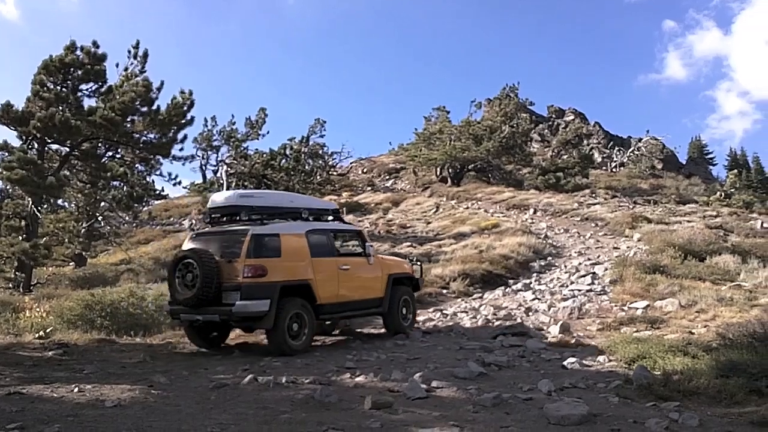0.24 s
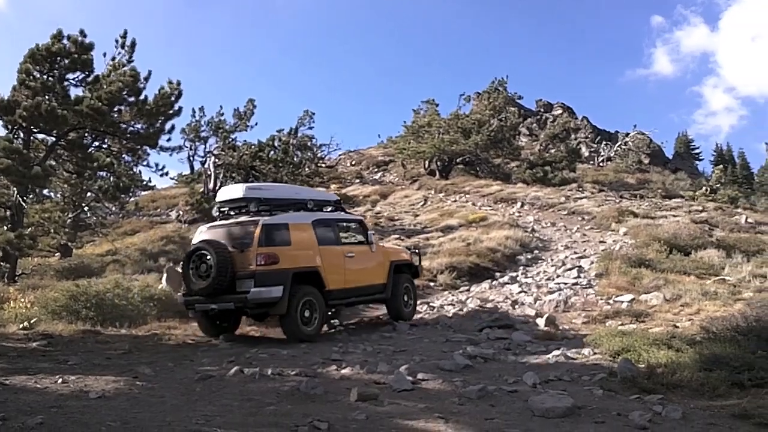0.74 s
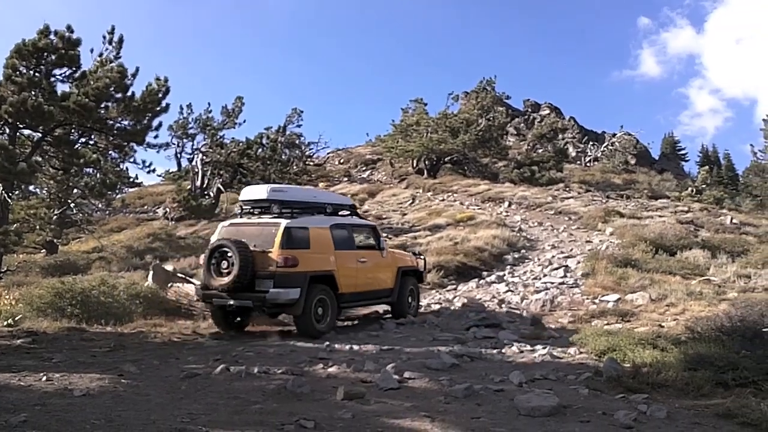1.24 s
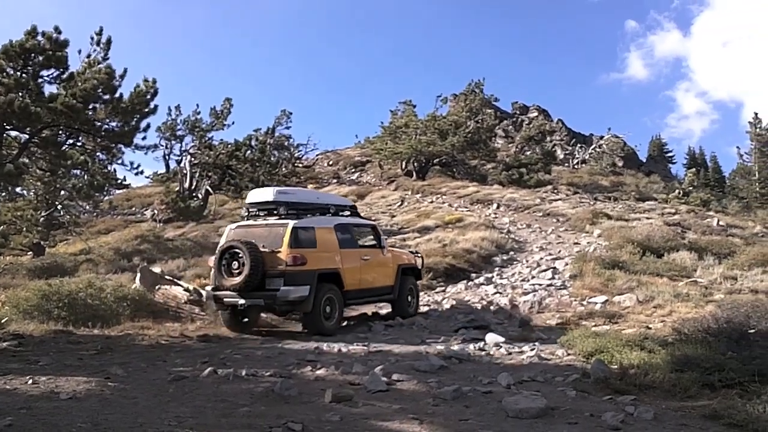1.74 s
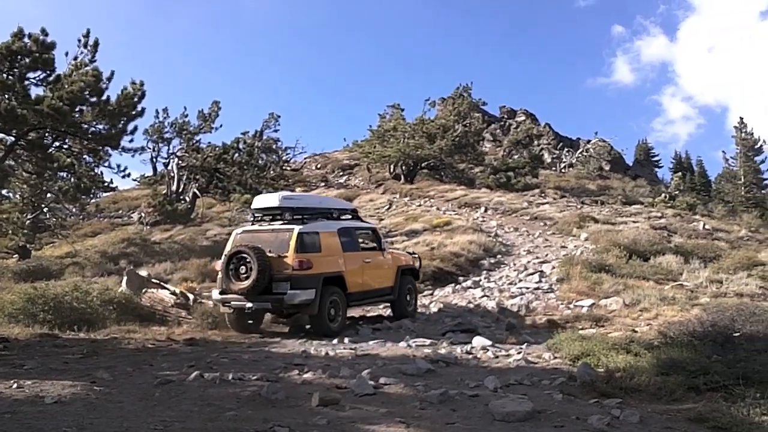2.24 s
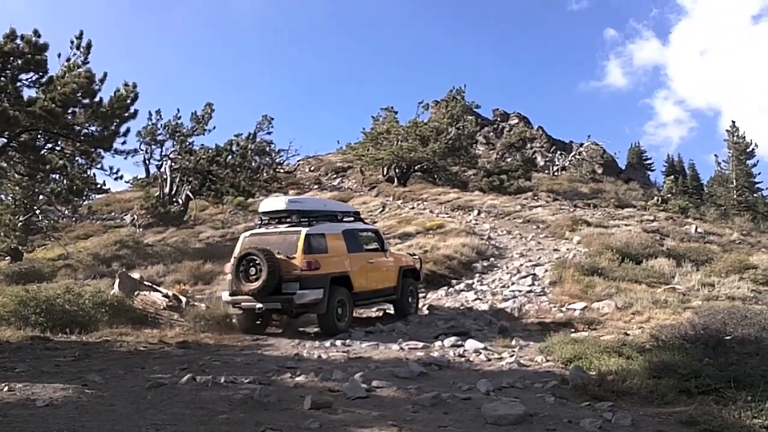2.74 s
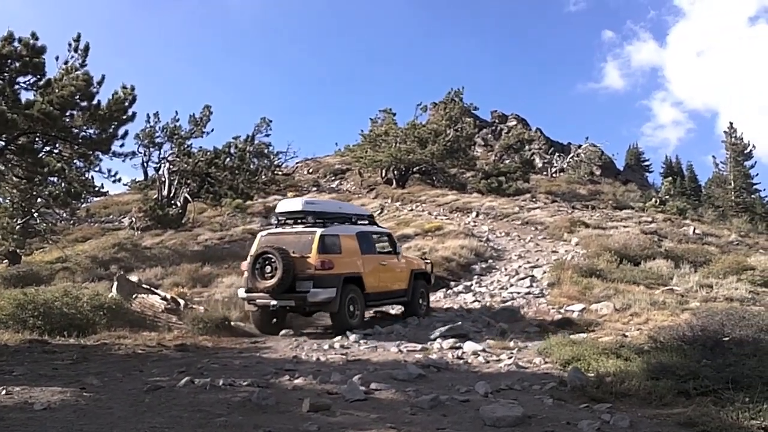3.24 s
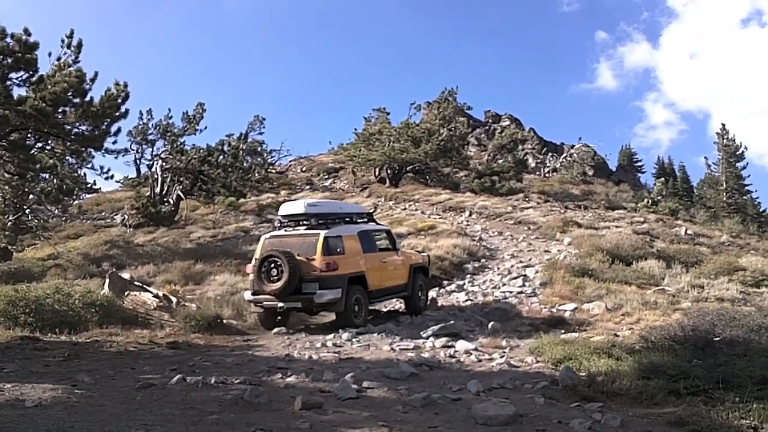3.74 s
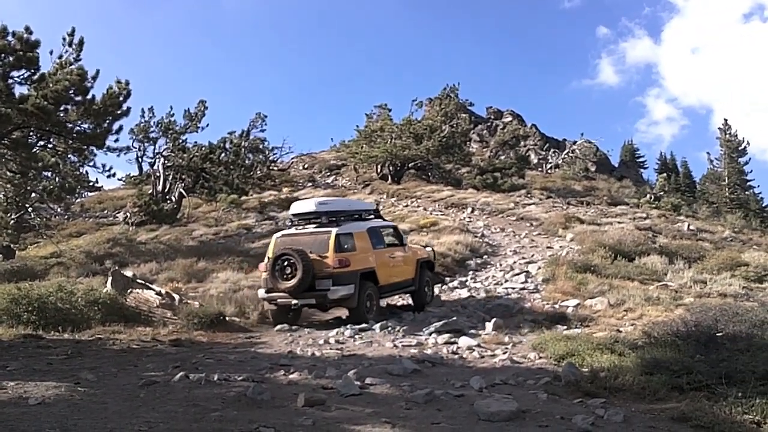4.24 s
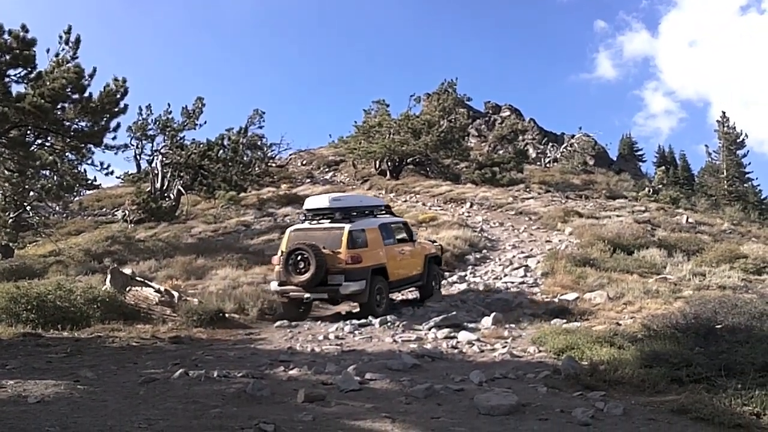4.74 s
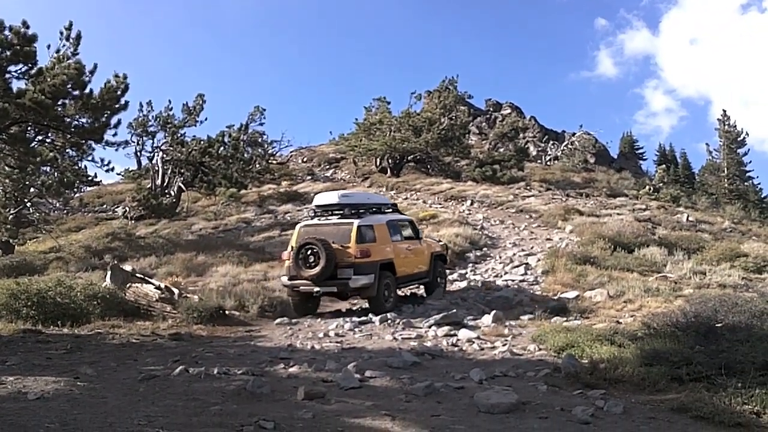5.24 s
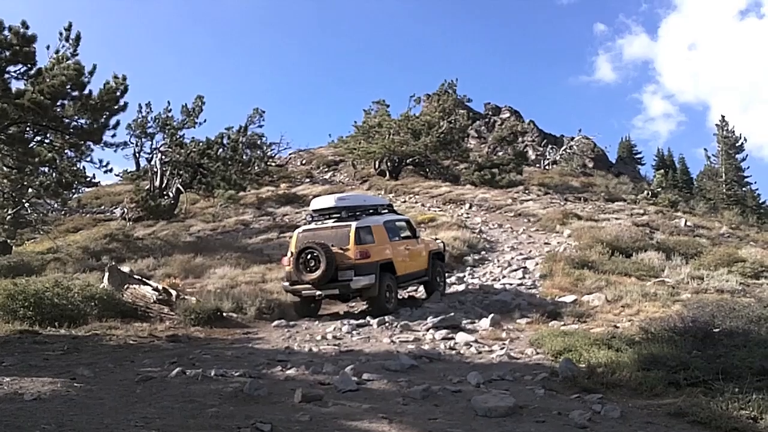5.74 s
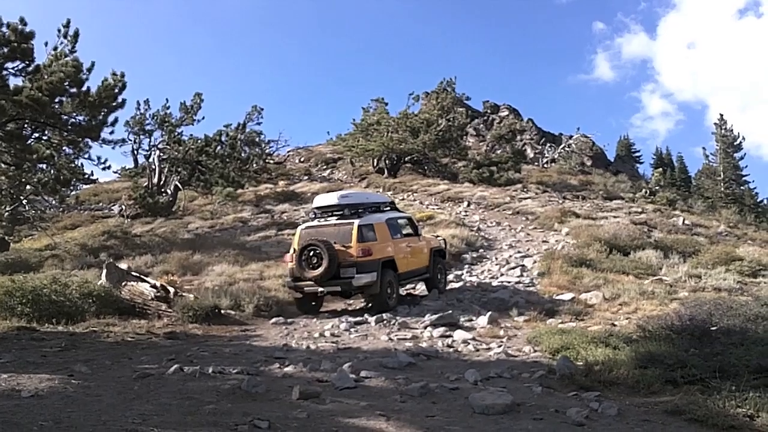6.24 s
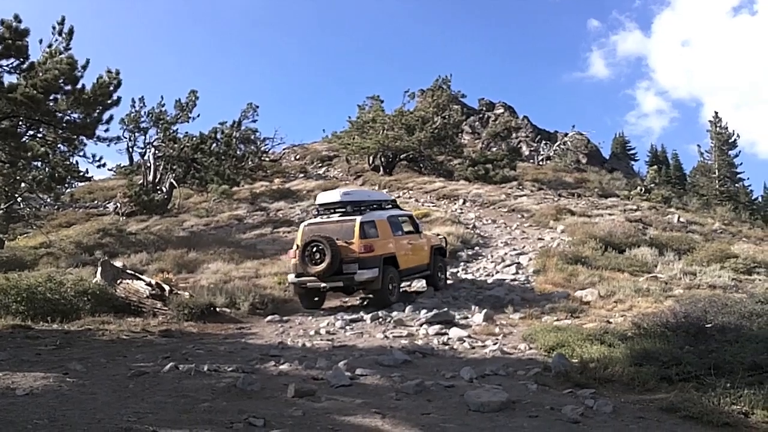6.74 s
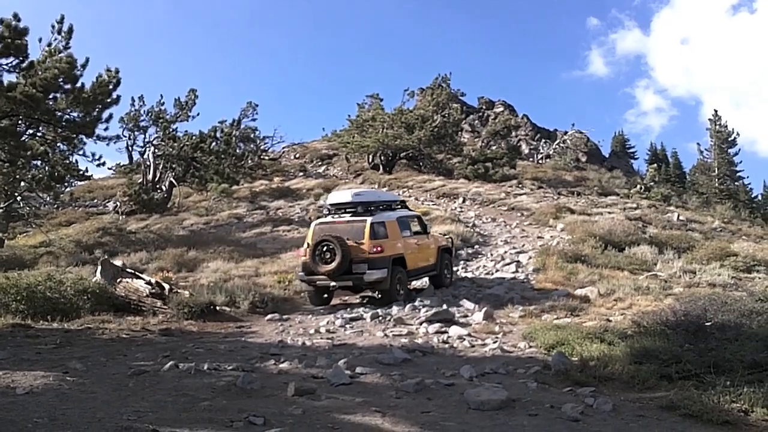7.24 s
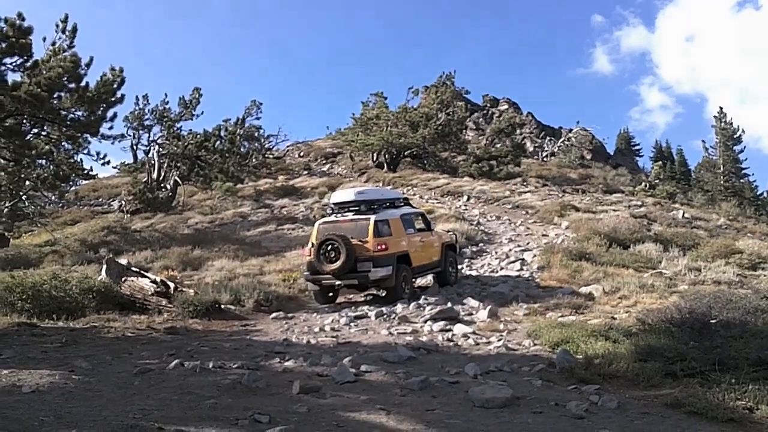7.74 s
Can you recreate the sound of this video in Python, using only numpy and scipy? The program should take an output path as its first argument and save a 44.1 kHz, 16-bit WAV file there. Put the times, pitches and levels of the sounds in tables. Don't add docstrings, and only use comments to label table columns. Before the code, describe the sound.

Outdoors on a rocky slope, an off-road car climbs away from a fixed microphone behind it. Its low exhaust drone booms and thins as the revs shift, with rough gas roar and gravelly hiss. Stones clack and crunch in scattered bursts, a small bird chips faintly, and wind bumps the microphone. The engine sags, revs again, then drops towards idle at the end.

```python
import sys
import numpy as np
from scipy import signal
from scipy.fft import rfft, irfft, next_fast_len
from scipy.io import wavfile
from scipy.ndimage import uniform_filter1d

SR = 44100
rng = np.random.default_rng(int(sys.argv[2]) if len(sys.argv) > 2 else 0)


def ratio_of_db(decibels):
    return 10 ** (np.asarray(decibels, float) / 20)


def unload_audio(sound):
    columns = np.transpose(np.atleast_2d(sound))
    steps = np.round(np.clip(columns, -1, 1) * 32767)
    wavfile.write(sys.argv[1], SR, steps.astype(np.int16))


N = 352359
T = np.arange(N) / SR


def level(x, db):
    return x * ratio_of_db(db) / np.sqrt(np.mean(x ** 2))


def colour_db(points, hz):
    f, db = np.transpose(points)
    return np.interp(np.log(np.maximum(hz, 1)), np.log(f), db, left=-60, right=-80)


def noise(points):
    size = next_fast_len(N)
    hz = np.arange(size // 2 + 1) * SR / size
    spectrum = rfft(rng.standard_normal(size)) * ratio_of_db(colour_db(points, hz))
    return level(irfft(spectrum, size)[:N], 0)


def smooth(x, k):
    return uniform_filter1d(uniform_filter1d(x, k), k)


def walk(rate):
    k = int(SR / rate)
    held = np.repeat(rng.standard_normal(N // k + 1), k)
    return 1.55 * smooth(held, k)[:N]


def band(x, lo_hz, hi_hz):
    y = signal.sosfilt(signal.butter(4, [lo_hz, hi_hz], "band", fs=SR, output="sos"), x)
    return y / np.abs(y).max()


# (t/s, f/Hz)
CYCLE_RATE = [(0, 27.0), (.3, 29.45), (1.12, 29.45), (1.53, 25.55), (1.8, 25.55), (2.22, 27.8),
              (3.06, 27.25), (3.25, 26.4), (3.5, 27.0), (3.75, 25.8), (4.03, 25.9), (4.27, 27.0),
              (4.66, 23.85), (5.05, 23.4), (5.5, 20.9), (6.15, 27.1), (6.42, 26.8), (7.55, 14.25)]


def engine_speed():
    return uniform_filter1d(np.interp(T, *np.transpose(CYCLE_RATE)), int(0.1 * SR), mode="nearest")


# (t/s, level/dB)
PEDAL = [(0, -3.5), (.22, 0.5), (.45, 1.1), (1.22, -2), (1.4, -7.5), (1.75, -2.5), (2.15, 0.9), (2.65, -2),
         (3.15, -1.5), (3.6, -2.5), (4.3, -2.7), (4.45, -2), (5.65, -1), (6.0, -2), (6.8, -0.5), (7.15, 3),
         (7.46, -5), (7.62, -1.5)]


def throttle():
    return np.interp(T, *np.transpose(PEDAL))


# (multiple, level/dB)
BOOM_DRIVE = [(4, -17.5), (5, -31.5), (6, -34), (7, -46), (8, -34.5)]


def boom_level(hz):
    peak_hz, skirt_hz, floor_db = 115.31, 3.12, -48
    power = ratio_of_db(2 * floor_db)
    for multiple, db in BOOM_DRIVE:
        off_peak = (multiple * hz - peak_hz) / skirt_hz
        power = power + ratio_of_db(2 * (db - off_peak ** 2))
    return 10 * np.log10(power)


PULL_DB = [-16, -2.5, -14, -4, -4, 0.5, -20, -2.5, -15, -7, -8.5, -7.5, -17, -17.5, -16, -16, -23, -16,
           -18.5, -17, -17, -20]
IDLE_DB = [-34.5, -21, 3.5, -22, -24, -24, -7, 7, -19, 3, -3, 8.5, -12, 8, 5.5, -4, -17, -18.5, -17, -20,
           -16, -15]
# (f/Hz, level/dB)
PIPE = [(20, -9.5), (38, -3), (50, 0), (75, -9), (135, -4), (165, -1), (190, -3.5), (218, 1.5), (238, -0.5),
        (260, -23), (330, -13), (450, -14.5), (660, -13.5)]
# (f/Hz, width/Hz, level/dB)
TAILPIPE = [(327, 14, 7), (441, 12, 9), (529, 12, 10), (622, 14, 7)]


def exhaust(hz, cycle, pull_db, boom_db):
    idle_hz, lug_hz, lug_db_per_hz = 17.5, 26.47, 2
    mode_hz, mode_width_hz = 113.4, 14.3
    idle = 1 / (1 + np.exp((hz - idle_hz) / 0.16))
    lug_db = (1 - idle) * lug_db_per_hz * np.maximum(lug_hz - hz, 0)
    boom, boom_power, rest = 0, 1e-12, 0
    for m, (pulling, idling) in enumerate(zip(PULL_DB, IDLE_DB), start=1):
        f = m * hz
        db = pulling + idle * (idling - pulling)
        db = db + ((m in (7, 9)) - (m == 10)) * lug_db
        for pipe_hz, width, gain_db in TAILPIPE:
            db = db + gain_db * np.exp(-((f - pipe_hz) / width) ** 2)
        detune = 2 * (f - mode_hz) / mode_width_hz
        inside = np.exp(-((f - 108) / 21) ** 6)
        wobble = walk(7.7)
        lag = np.arctan(detune) + 0.1 * (m - 4) ** 2
        tone = -np.sqrt(2) * np.cos(m * cycle - lag + 0.025 * m * walk(12))
        size = ratio_of_db(db) * inside / (1 + detune ** 2) ** 0.95
        boom = boom + size * ratio_of_db(0.41 * wobble) * tone
        boom_power = boom_power + size ** 2
        load_db = 0.25 * (m > 10) * (boom_db + 23)
        rest = rest + ratio_of_db(db + colour_db(PIPE, f) + 0.85 * wobble + load_db) * (1 - inside) * tone
    return ratio_of_db(boom_db) * boom / np.sqrt(boom_power) + ratio_of_db(pull_db) * rest


# (f/Hz, level/dB per Hz)
ROAR = [(60, -8), (130, 0), (220, 2), (270, -6.5), (330, -8.5), (390, -14), (470, -6), (540, -10.5),
        (640, -20), (720, -29), (900, -23)]


def roar(cycle, db):
    puff = 1 + 0.12 * np.cos(2 * cycle)
    swell_db = 0.7 * walk(7.9)
    return ratio_of_db(db + 3.5 + swell_db) * puff * noise(ROAR)


# (f/Hz, level/dB per Hz)
GRAVEL = [(300, -3), (700, 2), (910, 7.5), (1150, 1.5), (1390, 5), (1650, 3), (2100, 4.5), (3600, 4),
          (5000, 3), (5600, -8.5), (6900, -18.5), (7700, -36)]


def gravel(db):
    hits = rng.random(N) < 400 / SR
    hit_db = np.minimum(3.5 * rng.exponential(size=N), 14)
    grit = signal.lfilter([1], [1, -0.985], hits * ratio_of_db(hit_db))
    patchy_db = 0.6 * walk(4.9)
    return ratio_of_db(db + 4.5 + patchy_db) * level(noise(GRAVEL) * (1 + 0.21 * grit), 0)


def knocks(rows, t60, grit_db, scatter_s):
    out, t = np.zeros(N + SR), T[:SR // 4]
    for s, db, lo_hz, hi_hz in rows:
        shake = rng.standard_normal((3, len(t)))
        scatter = np.minimum(uniform_filter1d(shake[2], 150) ** 2 * 150, 2.5)
        chips = (0.55 + 0.67 * scatter) * np.exp(-t / scatter_s)
        fall = np.exp(-np.log(1000) * t / t60) + ratio_of_db(grit_db) * chips
        shake *= fall * np.minimum(t / 0.0005, 1)
        edge = ratio_of_db(-32) * (hi_hz / 5000) ** 2 * band(shake[1], 5600, 12500)
        i = int(s * SR)
        out[i:i + len(t)] += ratio_of_db(db) * (band(shake[0], lo_hz, hi_hz) + edge)
    return out[:N]


# (t/s, peak level/dB, low f/Hz, high f/Hz)
CLACKS = [(.2722, -28, 700, 2530), (.2815, -31.5, 800, 4000), (.5, -45, 700, 2500), (.988, -52, 3000, 7100),
          (1.159, -42, 1500, 2580), (2.662, -46.5, 800, 2400), (2.938, -48.5, 2500, 5900),
          (2.971, -44, 900, 5840), (3.491, -46.5, 500, 1830), (4.3685, -29, 398, 1540),
          (4.3686, -24, 1606, 2330), (4.376, -41.5, 3200, 4600), (4.478, -41, 3200, 5200),
          (6.215, -48, 500, 1500), (6.498, -43, 1200, 2500), (6.624, -34.5, 500, 3940),
          (6.644, -32, 400, 1350), (6.5162, -35, 1310, 4440), (6.645, -34.5, 1500, 4400),
          (6.759, -50.5, 1000, 1600), (7.441, -53, 1500, 2500), (7.466, -51.5, 3000, 4000)]
# (t/s, peak level/dB, low f/Hz, high f/Hz)
CRUNCHES = [(.002, -36.5, 603, 5200), (1.022, -36.5, 1900, 2600), (1.023, -33, 690, 4730),
            (1.06, -41, 700, 5000), (1.097, -38.5, 1830, 4980), (2.703, -47.5, 1100, 1595),
            (4.125, -37, 1520, 4740), (4.209, -42.5, 1200, 4970), (4.301, -29, 3200, 4960),
            (4.301, -37.5, 1500, 2520), (4.374, -38, 400, 2300), (4.879, -49.5, 3850, 5000),
            (5.188, -34, 1110, 4870), (5.236, -43.5, 700, 4200), (6.519, -37, 1310, 4100),
            (6.634, -34.5, 398, 1410), (6.634, -46, 3000, 5000)]


def stones():
    clacks = knocks(CLACKS, t60=0.011, grit_db=-11, scatter_s=0.02)
    crunches = knocks(CRUNCHES, t60=0.051, grit_db=-3, scatter_s=0.048)
    return clacks + crunches


# (t/s, length/s, first f/Hz, last f/Hz, level/dB)
CHIPS = [(1.618, 0.064, 4820, 5100, -52.5), (1.632, 0.061, 5460, 6570, -59.5),
         (2.731, 0.033, 5600, 5920, -57), (3.389, 0.028, 4930, 5240, -55),
         (3.394, 0.031, 5600, 6290, -56.5), (3.754, 0.017, 5810, 6420, -63.5),
         (4.044, 0.045, 5440, 6230, -67), (5.738, 0.038, 5680, 6470, -74), (7.43, 0.07, 4570, 4960, -74),
         (7.498, 0.058, 4760, 5170, -60.5), (7.528, 0.058, 5440, 6530, -61)]


def bird():
    out = np.zeros(N)
    for s, length, hz0, hz1, db in CHIPS:
        u = np.arange(int(length * SR)) / (length * SR)
        jitter = rng.standard_normal((2, SR // 5))
        husk = smooth(jitter, 36)[:, :len(u)] * 7.3
        phase = 2 * np.pi * np.cumsum(hz0 + (hz1 - hz0) * u + 230 * husk[0]) / SR
        octave = 0.1 * (hz0 / 5700) ** 6 * np.sin(2 * phase)
        swell = np.sin(np.pi * u ** 0.6) ** 1.5
        note = (np.sin(phase) + octave) * (1 + 0.35 * husk[1]) * swell
        i = int(s * SR)
        out[i:i + len(u)] += ratio_of_db(db + 8) * note
    echo = rng.standard_normal(SR // 8) * np.exp(-T[:SR // 8] / 0.018)
    return out + ratio_of_db(-29.5) * signal.fftconvolve(out, echo)[:N]


# (t/s, level/dB, length/s)
GUSTS = [
    (1.104, -45, 0.033),
    (3.446, -38.5, 0.028),
    (3.647, -41, 0.078),
    (5.387, -49, 0.044),
    (5.944, -30, 0.018),
    (5.86, -43, 0.06),
    (7.33, -70, 0.045),
]


def wind():
    bumps = sum(ratio_of_db(db) * np.exp(-((T - s) / length) ** 2) for s, db, length in GUSTS)
    flutter_db = 2.5 * walk(2.5)
    calm_s, calm_drop_db = 6.9, -14
    calm_db = calm_drop_db / (1 + np.exp((calm_s - T) * 10))
    rumble = noise([(8, -6.5), (25, -5.0), (60, -10.5), (110, -1.0), (200, -28.0)])
    return (ratio_of_db(-52.5 + flutter_db + calm_db) + bumps) * rumble


def scene():
    hz, throttle_db = engine_speed(), throttle()
    start_m, climb_m_per_s = 7.7, 0.74
    far_db = -20 * np.log10(1 + climb_m_per_s * T / start_m)
    lift_s, lift_spread_s = 7.14, 0.14
    coast = 1 / (1 + np.exp((lift_s - T) / lift_spread_s))
    pull_db = -38 + 0.36 * throttle_db - 22 * coast + 0.69 * far_db
    boom_db = boom_level(hz) + throttle_db + far_db
    revs = hz - 29.5
    roar_db = -40 + 1.29 * revs + 0.6 * throttle_db + far_db
    gravel_db = -55 + 0.6639 * revs + 0.12 * throttle_db + far_db
    cycle = 2 * np.pi * np.cumsum(hz) / SR
    car = exhaust(hz, cycle, pull_db, boom_db) + roar(cycle, roar_db) + gravel(gravel_db)
    return (car + stones() + bird() + wind())[None]


def band_limit(x):
    return signal.sosfilt(signal.butter(12, 14990, fs=SR, output="sos"), x)


# (f/Hz, level/dB per Hz)
HISS = [(200, -8), (3000, -2.5), (7000, -6.5), (8200, -6), (9300, -0.5), (10300, 0), (12000, -2.5),
        (14500, -3), (15200, -35.5)]
# (f/Hz, width/Hz, depth 0-1)
NOTCHES = [(2718, 363, 0.92), (5395, 790, 0.8), (7740, 290, 0.6), (10930, 400, .8)]


def record(dry):
    x = dry + ratio_of_db(-80.0) * noise(HISS)
    for hz, width, depth in NOTCHES:
        peak = signal.iirpeak(hz, hz / width / 1.69, SR)
        x = x - depth * signal.filtfilt(*peak, x)
    return band_limit(x)


dry = scene()
out = record(dry)
unload_audio(out)
```